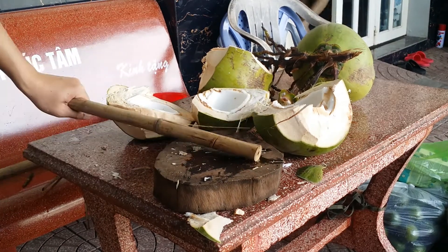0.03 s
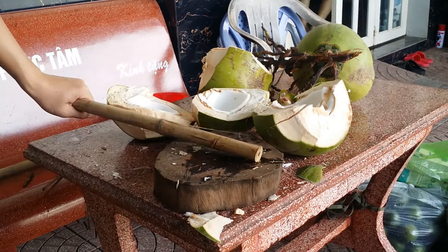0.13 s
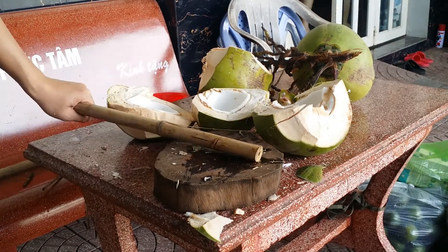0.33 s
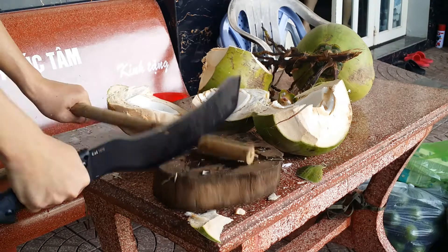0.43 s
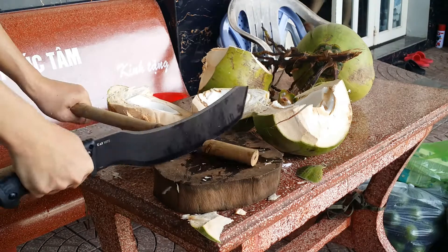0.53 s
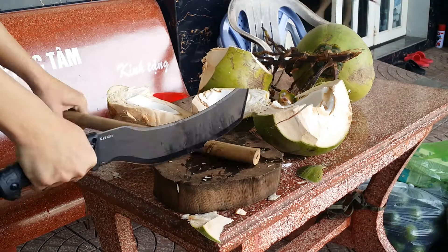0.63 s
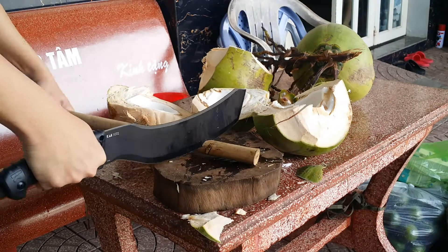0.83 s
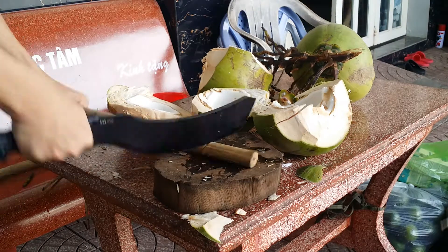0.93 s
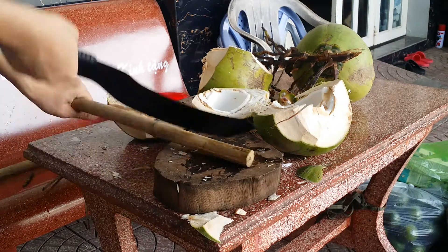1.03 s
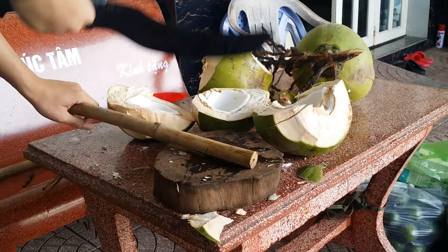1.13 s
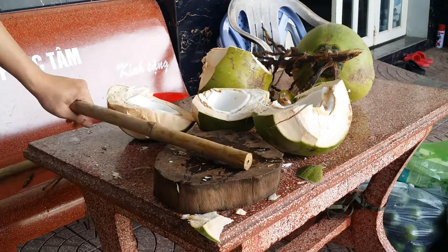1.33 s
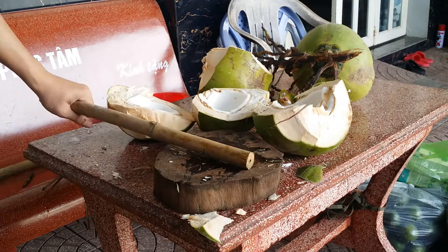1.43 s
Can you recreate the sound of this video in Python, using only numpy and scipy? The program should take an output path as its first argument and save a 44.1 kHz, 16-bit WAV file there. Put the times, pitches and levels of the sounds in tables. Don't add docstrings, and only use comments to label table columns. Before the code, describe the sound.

One loud woody chop with a sharp crack and quick bounces, over low humming distant traffic.

```python
import sys
import numpy as np
from scipy import signal
from scipy.fft import rfft, irfft
from scipy.io import wavfile
from scipy.ndimage import uniform_filter1d

SR = 44100
rng = np.random.default_rng(int(sys.argv[2]) if len(sys.argv) > 2 else 0)


def waveform_to_disk(signal):
    frames = np.transpose(np.atleast_2d(signal))
    scaled = np.clip(frames, -1, 1) * 32767
    samples = np.round(scaled).astype(np.int16)
    wavfile.write(sys.argv[1], SR, samples)


def amplitude_ratio(level_db):
    exponent = np.asarray(level_db, float) / 20
    return 10 ** exponent


N = 66150
TIME_S = np.arange(N) / SR
BIN_HZ = np.fft.rfftfreq(N, 1 / SR)


def curve(table, x, col=1, log=False):
    a = np.array(table, float)
    if log:
        return np.interp(np.log(x + 1), np.log(a[:, 0] + 1), a[:, col])
    return np.interp(x, a[:, 0], a[:, col])


def colour(x, table, lag_s=0):
    hz = np.fft.rfftfreq(x.shape[-1], 1 / SR)
    delay = np.exp(-2j * np.pi * hz * lag_s)
    return irfft(rfft(x) * amplitude_ratio(curve(table, hz, log=True)) * delay, x.shape[-1])


def unit(x):
    return x / np.sqrt(np.mean(x ** 2))


def walk(rate_hz):
    k = int(SR / rate_hz)
    steps = np.repeat(rng.standard_normal(N // k + 1), k)
    return 1.3 * uniform_filter1d(uniform_filter1d(steps, k), k)[:N]


def decay(at_s, tau_s):
    return (TIME_S >= at_s) * np.exp(-np.maximum(TIME_S - at_s, 0) / tau_s)


def ring(at_s, modes, scatter_db, scatter_hz):
    touch_s = 0.00021
    t = np.maximum(TIME_S - at_s, 0)
    chance = rng.standard_normal((len(modes), 2))
    out = 0
    for (hz, db, t60_s, *sign), (a, b) in zip(modes, chance):
        level = np.prod(sign) * amplitude_ratio(db + scatter_db * a)
        tone = np.sin(2 * np.pi * hz * (1 + scatter_hz * b) * t)
        out = out + level * tone * 1000. ** (-t / t60_s)
    return (1 - np.exp(-(t / touch_s) ** 2)) * out


def bands(shape):
    out = 0
    for hz in 40 * 2 ** np.arange(0, 9, .5):
        window = np.cos(np.pi * np.clip(np.log2(BIN_HZ / hz + 1e-9), -.5, .5))
        out = out + irfft(rfft(rng.standard_normal((2, N))) * window, N) * shape(hz)
    return out


# (frequency [Hz], likeness [0-1])
PORT_LIKENESS = [(60, 0.7), (150, 0.96), (350, 0.4), (700, 0.7), (1500, .4), (5000, .3)]


def ports(one, other):
    c = np.clip(curve(PORT_LIKENESS, BIN_HZ, log=True), 0, 1)
    left = irfft(c * rfft(one) + np.sqrt(1 - c ** 2) * rfft(other), N)
    return np.array([left, one])


# (time [s], level [dB])
TRAFFIC_LEVEL = [(0.0, -36.5), (0.028, -35), (0.174, -34), (0.196, -30), (0.238, -29.5), (0.262, -33),
                 (0.324, -25), (0.404, -40), (0.5, -33.5), (0.53, -46.5), (0.554, -41), (0.78, -48.5),
                 (1.002, -47.5), (1.122, -47), (1.232, -45.5), (1.39, -45.5), (1.408, -41), (1.5, -36)]
# (frequency [Hz], density [dB per Hz])
ROAD_COLOUR = [(40, -36.5), (100, -15), (150, -9.5), (290, -18.5), (900, -26), (3500, -38), (6000, -50.5),
               (8000, -64.5)]


def traffic():
    wash_db, wash_follows = 3, .7
    hum_hz, hum_width_hz, hum_db = 126.2, 31.2, 2.5
    db = curve(TRAFFIC_LEVEL, TIME_S)

    def flicker(hz):
        share = wash_follows + (1 - wash_follows) / (1 + (hz / 300) ** 2)
        return amplitude_ratio(share * (db - db.mean()) + 1.2 * walk(8))

    wash = unit(colour(bands(flicker), ROAD_COLOUR)) * amplitude_ratio(wash_db + db.mean())
    b, a = signal.iirpeak(hum_hz, hum_hz / hum_width_hz, SR)
    hum = signal.lfilter(b, a, signal.lfilter(b, a, rng.standard_normal((2, N))))
    hum = unit(hum) * amplitude_ratio(db + hum_db)
    return ports(*(wash + hum))


# (time [s], level [dB], crack brightness [dB])
BLOWS = [
    (.3820, -45, 10),
    (.3844, -20, 6),
    (.3850, 3, 0),
    (.3905, -10, -20),
    (.3930, -10, -22),
    (.3990, -12, 2),
    (.4003, -17, 5),
    (.4045, -17, 0),
    (.4070, -12, -20),
]
# (frequency [Hz], level [dB], t60 [s])
STICK_MODES = [(201, -17, 0.13), (620, -28, 0.025), (1184, -6.5, 0.017), (1570, 10, 0.013),
               (1765, -6, 0.064), (2013, -11, 0.11), (2720, -21.5, 0.075), (3165, -0.5, 0.0083),
               (3570, -3.5, 0.016), (4228, -12.5, 0.034), (4540, -15.5, 0.038), (5180, -22.5, 0.018)]
# (frequency [Hz], level [dB])
CRACK_COLOUR = [(300, -25), (1500, -8), (4200, 0), (6500, -9), (10500, -3), (14000, -6), (16000, -20)]


def chop():
    chop_db, crack_db, crack_s = 2, -1, .0006
    out = 0
    for at_s, db, bright_db in BLOWS:
        crack = unit(colour(rng.standard_normal(N), CRACK_COLOUR)) * decay(at_s, crack_s)
        stick = 0.48 * ring(at_s, STICK_MODES, scatter_db=3.5, scatter_hz=0.032)
        out = out + amplitude_ratio(db) * (stick + amplitude_ratio(crack_db + bright_db) * crack)
    return amplitude_ratio(chop_db) * out


# (frequency [Hz], level [dB], t60 [s])
YARD_BANDS = [(150, -10.5, .5), (324, -5.5, 1), (900, 4.5, .5), (1730, 3.5, 0.55), (2220, 1, 0.51),
              (5700, -17.5, 0.54), (7350, -37, 0.93), (10600, -35, 0.25), (12840, -46.5, 0.089)]


def yard(x):
    near_db, near_s = -12.5, 0.077
    far_db, far_at_s, far_rise_s, far_hold_s = -12, 0.04, .004, 0.043
    grain_db = 2.0
    late_s = TIME_S - far_at_s
    near = amplitude_ratio(near_db) * np.exp(-TIME_S / near_s)
    far = amplitude_ratio(far_db) * np.clip(late_s / far_rise_s, 0, 1)
    grain = amplitude_ratio(grain_db * walk(300))

    def shape(hz):
        t60_s = curve(YARD_BANDS, hz, col=2, log=True)
        tail = 1000. ** (-np.maximum(late_s - far_hold_s, 0) / t60_s)
        return amplitude_ratio(curve(YARD_BANDS, hz, log=True)) * grain * (near + far * tail)

    return signal.fftconvolve(ports(*bands(shape)), x[None])[:, :N]


# (time [s], level [dB])
TINKS = [
    (0.8611, -27.5),
]
# (frequency [Hz], level [dB], t60 [s], polarity [+1/-1])
STEEL_MODES = [(2546, 0, .11, 1), (2596, -9, .16, 1), (3610, -11, .3, -1), (3665, -11, .3, 1),
               (5090, -16, .35, 1), (5150, -15, .35, 1), (5260, -20, .2, 1), (6191, -23, .25, 1),
               (7246, -22, .2, 1), (7700, -22, .15, 1), (9600, -27, .25, 1), (10200, -25, .25, 1),
               (10980, -26, .25, 1), (12790, -30, .2, 1)]


def blade():
    rattle_db, rattle_s, rattle_hz = -31, 0.043, 8600
    flutter_db = 1.5
    rattle = unit(colour(rng.standard_normal(N), [(2000, -30), (rattle_hz, 0), (15000, -4)]))
    rattle = rattle * amplitude_ratio(4 * walk(400))
    out = 0
    for at_s, db in TINKS:
        tink = amplitude_ratio(rattle_db) * rattle * decay(at_s, rattle_s)
        for k in range(0, 14, 2):
            flutter = amplitude_ratio(flutter_db * walk(120))
            tink = tink + flutter * ring(at_s, STEEL_MODES[k:k + 2], scatter_db=0, scatter_hz=0)
        out = out + amplitude_ratio(db) * tink
    return out


# (time [s], gain [dB])
GAIN = [(0, 9.5), (.40, 2.5), (.52, -6.5), (.75, -10.5), (1.3, -16), (1.5, -2)]


def gain():
    return amplitude_ratio(curve(GAIN, TIME_S))


def scene():
    clicks = np.zeros(N)
    for at_s, db, _ in BLOWS:
        clicks[int(at_s * SR)] = amplitude_ratio(db)
    struck = chop() + blade() + yard(clicks)
    return struck + traffic() / gain()


def patches(x):
    from_hz, patch_hz, patch_db, patch_frames = 6600, 340, 10, 4
    hz, t, z = signal.stft(x, SR, nperseg=1024)
    chance = rng.standard_normal((2, len(hz), len(t)))
    cell = chance[:, (hz // patch_hz).astype(int)][:, :, np.arange(len(t)) // patch_frames]
    on = (hz[:, None] > from_hz) & (np.abs(t - BLOWS[2][0]) > .015)
    z = z * amplitude_ratio(on * patch_db * np.minimum(cell - .4, .6))
    return signal.istft(z, SR, nperseg=1024)[1][:, :N]


# (frequency [Hz], level [dB])
MUFFLE = [(60, -5.5), (200, -6.5), (400, -10), (700, -15), (1300, -19), (2400, -23), (6000, -21),
          (14000, -10)]


def muffle(left):
    return colour(left, MUFFLE, lag_s=0.00037)


def band_limit(x):
    return signal.sosfilt(signal.butter(12, 15730, fs=SR, output="sos"), x)


def record(dry):
    hiss_db, hiss_hz = -73, 6700
    clip, low_hz, top_hz = 1, 45, 14600
    hiss_filter = signal.butter(2, hiss_hz, "high", fs=SR, output="sos")
    hiss = signal.sosfilt(hiss_filter, rng.standard_normal((2, N)))
    x = np.array([muffle(dry[0]), dry[1]]) + amplitude_ratio(hiss_db) * hiss
    x = x * gain()
    x = x / (1 + np.abs(x / clip) ** 4) ** (1 / 4)
    x = signal.sosfilt(signal.butter(3, low_hz, "high", fs=SR, output="sos"), x)
    x = signal.sosfilt(signal.ellip(6, .5, 35, top_hz, fs=SR, output="sos"), x)
    mix = np.clip(patches(x), -1, 1)
    return band_limit(mix)


dry = scene()
out = record(dry)
waveform_to_disk(out)
```